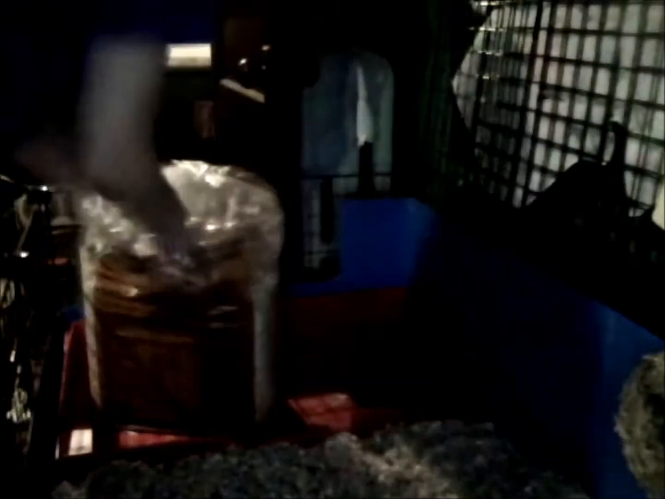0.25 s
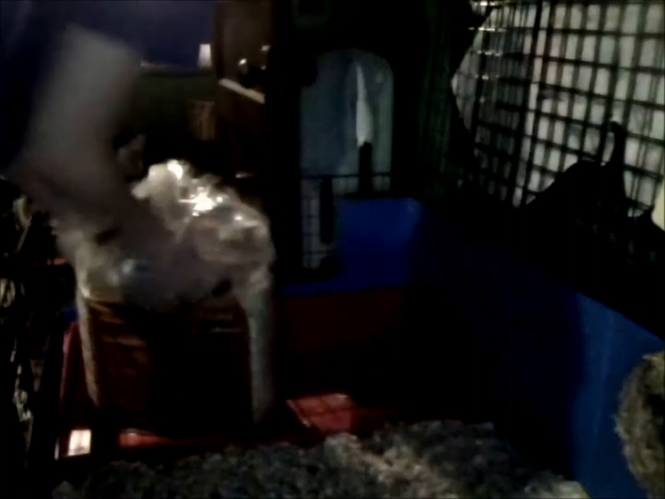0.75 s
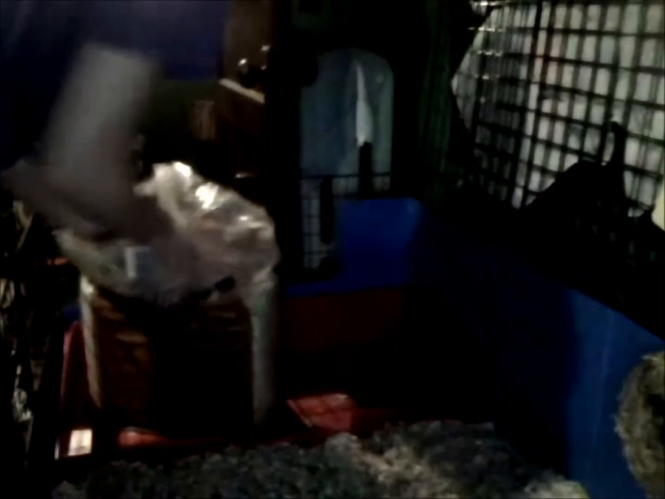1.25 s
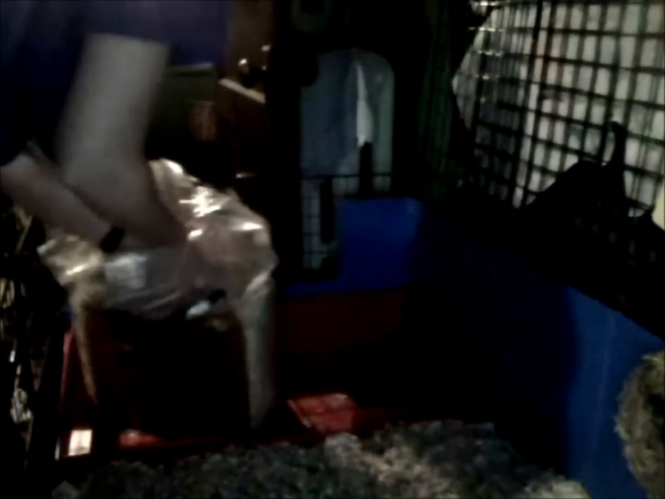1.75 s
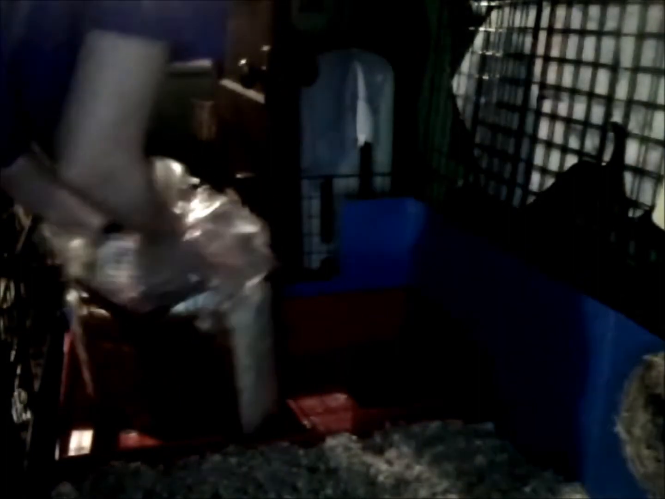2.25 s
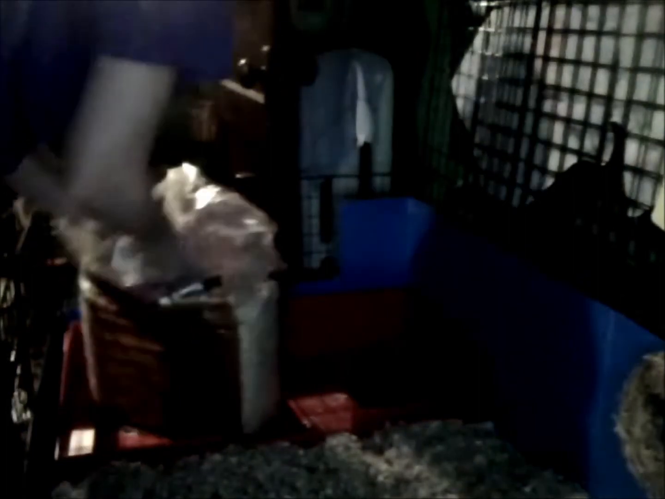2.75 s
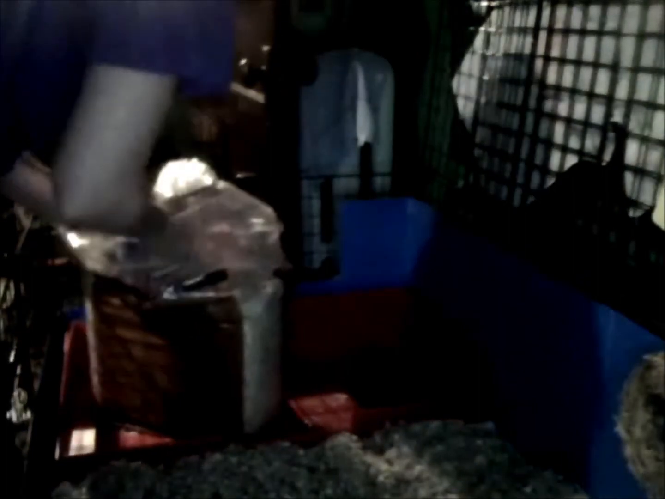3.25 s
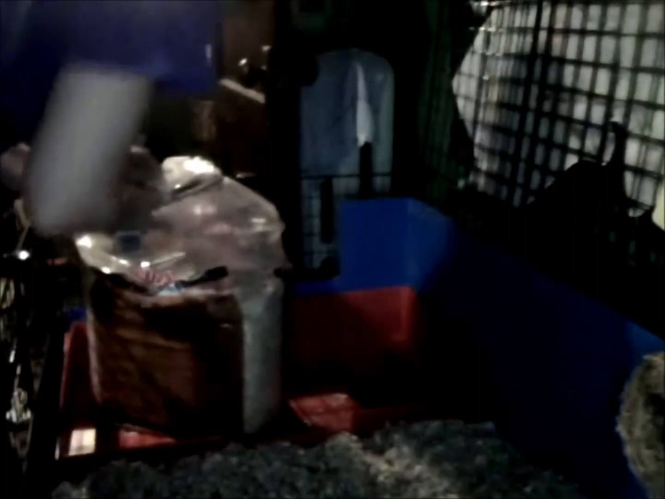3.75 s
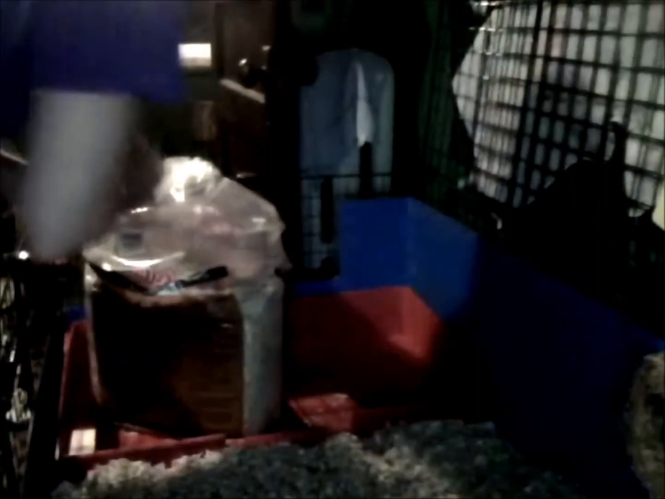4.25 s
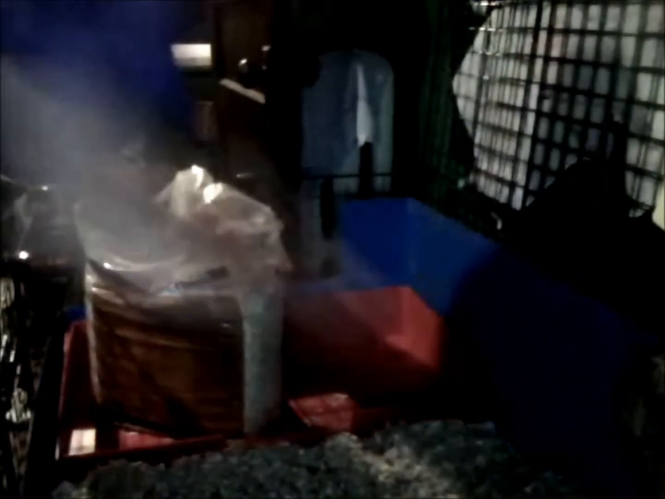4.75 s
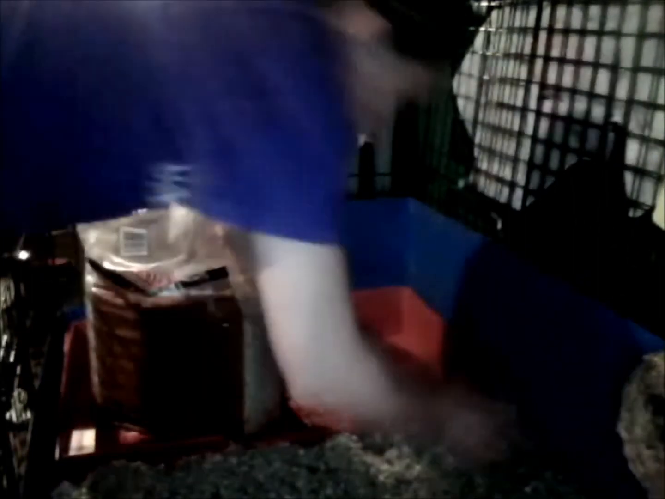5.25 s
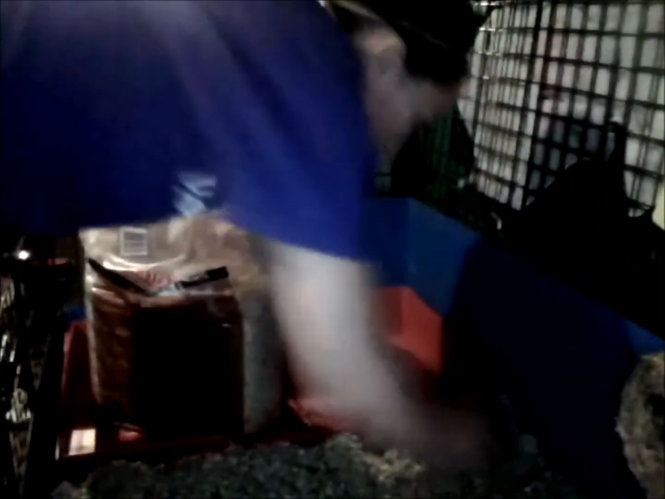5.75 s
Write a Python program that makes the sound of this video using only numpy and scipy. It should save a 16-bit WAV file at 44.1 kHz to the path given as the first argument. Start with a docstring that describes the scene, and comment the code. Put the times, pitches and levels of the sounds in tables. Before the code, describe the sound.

A dull knock and a crunchy rustle open the sound as a hand pushes into wood shavings, their plastic wrapping crackling close by. A few quiet seconds follow, holding only small ticks, light scraping and a single hollow plastic tap. Near the end the handful lands in a cage with a short, soft slap, then a click and gentle rustling. Low room tone with a faint hum continues throughout in the small indoor space.

```python
"""A dull bump and a crunch, close to the microphone: a hand digs into a plastic-wrapped bale of wood shavings
in a small room. Creases in the film buckle and snap; flakes scrape on each other. The handful is worked loose
with faint ticks and a tap on plastic, then dropped on the bedding of a cage in a few soft slaps and spread out.
Low room tone with a faint hum lies under it all."""
import sys
import numpy as np
from scipy import signal
from scipy.fft import rfft, irfft, next_fast_len
from scipy.io import wavfile

SR = 44100
rng = np.random.default_rng(int(sys.argv[2]) if len(sys.argv) > 2 else 0)


def transcribe(signal):
    """Save signal, clipped to [-1, 1], as a 16-bit WAV file at the path in sys.argv[1]."""
    frames = np.atleast_2d(signal).T
    limited = np.clip(frames, -1, 1)
    pcm = np.round(limited * 32767).astype(np.int16)
    wavfile.write(sys.argv[1], SR, pcm)


N = 264114

# strokes of the hand: middle t/s, length/s, flake level/dB, dull rubbing relative to the flakes/dB
HAND_STROKES = [(0.04, 0.092, -58, 4), (0.093, 0.014, -45, 2.5), (0.125, 0.034, -46, 1),
                (0.2, 0.025, -36.5, -11), (0.3, 0.077, -50.5, 1), (.385, 0.091, -35, -16),
                (0.523, .08, -30.5, -7.5), (0.592, 0.062, -38, -7), (0.68, 0.09, -46, -2.5),
                (1.645, 0.15, -60, -0.5), (1.94, 0.21, -62.5, 1), (2.34, 0.094, -65, 1.5),
                (3.556, 0.042, -65.5, -9), (4.231, 0.029, -67, 7.5), (4.32, 0.11, -69, 3),
                (4.47, 0.16, -69.5, -9), (5.144, 0.1, -57, 4.5), (5.355, 0.063, -63, 3.5),
                (5.475, 0.084, -64, -4), (5.729, 0.067, -58.5, -5), (5.834, 0.065, -60.5, -4),
                (5.98, 0.029, -65, -4)]
# spectrum of loose flakes scraping: f/Hz, relative level/dB
FLAKE_SPECTRUM = [(150, -44), (600, -14.5), (1500, -12), (2600, -3.5), (4000, -0.5), (5500, -3),
                  (7000, -5.5), (7800, -18), (8700, -32)]
# spectrum of packed shavings rubbing: f/Hz, relative level/dB
PACKED_SPECTRUM = [(40, -5), (100, -6), (220, -2.5), (450, -2.5), (900, -1.5), (1500, -4), (2500, -6),
                   (5000, -48), (8700, -47.5)]
# snaps of the film and of single flakes: t/s, level/dB, low cut f/Hz, facet ring f/Hz
SNAP_EVENTS = [(0.1906, -26.5, 1900, 4540), (.215, -40, 1500, 2490), (.262, -50, 900, 3000),
               (.302, -41.5, 700, 1100), (0.4184, -35, 1500, 2010), (0.4551, -31.5, 2200, 2830),
               (0.4968, -22.5, 603, 4170), (0.5098, -22.5, 600, 5430), (0.5977, -27.5, 1410, 4100),
               (.624, -35.5, 900, 2470), (0.65, -25, 710, 4970), (0.7173, -31.5, 1810, 2520),
               (0.757, -52.5, 2000, 4740), (0.9596, -52.5, 1690, 2620), (1.2689, -37.5, 2490, 4800),
               (1.759, -54, 1500, 2410), (1.7896, -54.5, 2000, 3000), (2.031, -53, 1400, 2170),
               (2.32, -58, 2000, 4000), (2.3598, -52.5, 1300, 2370), (4.2246, -54.5, 1800, 2600),
               (4.292, -54, 1500, 2490), (5.188, -48.5, 800, 2030), (5.2722, -33.5, 2230, 2220)]
# spectrum of buckling film: f/Hz, relative level/dB
FILM_SPECTRUM = [(100, -15.5), (800, -0.5), (1700, -4), (2300, -2), (4000, -5), (6900, -7), (7700, -17.5),
                 (8700, -33)]
# bumps on the bale: t/s, thud level/dB, thud centre f/Hz, crunch level/dB, crunch high cut f/Hz
BALE_BUMPS = [(0.0282, -33, 200, -27, 4000), (0.0944, -58, 1100, -33.5, 4200),
              (0.12, -28.5, 770, -28, 6200), (.1292, -57, 800, -29, 6800), (.344, -36.5, 1100, -41.5, 6500),
              (0.53, -38.5, 323, -38, 4000), (0.605, -46, 200, -43, 4000), (0.6487, -39, 1040, -49, 5000)]
# modes of the wrapped bale: f/Hz, relative level/dB, t60/s
BALE_MODES = [(85, -6, 0.11), (136, -6, 0.098), (218, -5, 0.14), (341, -2.5, 0.057), (490, 0, 0.063),
              (630, -5, 0.066), (784, 2.5, 0.061), (868, 6, 0.062), (1066, 4, 0.059), (1197, 1.5, 0.046)]
# spectrum of flakes crushed by a bump: f/Hz, relative level/dB
CRUNCH_SPECTRUM = [(100, -11), (700, -2), (1600, -4), (2300, -2.5), (3700, 0), (5000, -5), (6600, -2),
                   (7700, -16), (8700, -26)]
# clumps landing in the cage: t/s, shower level/dB, rise/s, t60/s, slap weight/dB
FALLING_CLUMPS = [(5.09, -25.5, 0.0054, 0.074, -4.5), (5.1014, -23.5, 0.00081, 0.064, -3),
                  (5.114, -24.5, 0.0024, 0.057, -11), (5.133, -34, 0.0022, 0.031, -16)]
# spectrum of the struck bedding: f/Hz, relative level/dB
BEDDING_SPECTRUM = [(30, -15), (90, -7), (170, -5.5), (300, -11.5), (440, -3.5), (620, -6.5), (970, 0.5),
                    (1300, -9.5), (2000, -3.5), (3200, -6.5), (3900, -10), (6200, -11.5), (7400, -21.5),
                    (8700, -41.5)]
# hollow taps on hard plastic: t/s, level/dB
PLASTIC_TAPS = [(3.4868, -35)]
# modes of the hard plastic: f/Hz, bandwidth/Hz, relative level/dB
PLASTIC_MODES = [(594, 400, -6), (1210, 340, 3), (2360, 130, 1.5), (3860, 490, 6), (5030, 140, -18),
                 (5560, 420, 1.5), (7100, 350, 2.5)]
# spectrum of the room tone: f/Hz, relative level/dB
ROOM_SPECTRUM = [(12, -13), (20, -1.5), (92, -2.5), (202, -5), (261, -6.5), (328, -5), (372, -6),
                 (412, -5.5), (531, -8.5), (720, -10.5), (778, -9), (1800, -21.5), (6250, -35), (7280, -46),
                 (8700, -73), (11300, -74), (19100, -120)]
# tones of the hum in the room: f/Hz, level/dB
HUM_TONES = [(91.5, -71.5), (500.6, -72.5), (725, -73)]


def rustle(t, leaves_bale_s=4.9):
    """Close up, flakes scrape and packed shavings rub; film crackles while the hand is in the bale."""
    flakes = unit(colour(grains(per_s=7000, spread_db=1), FLAKE_SPECTRUM))
    pops = np.abs(grains(per_s=130, spread_db=2.6))
    bursts = signal.fftconvolve(pops, fade(t[:2048], t60=.008))[:N]
    crackle = unit(colour(bursts * rng.standard_normal(N), FLAKE_SPECTRUM))
    packed = unit(colour(grains(per_s=2500, spread_db=3), PACKED_SPECTRUM))
    film_share = .35 * (t < leaves_bale_s)
    bright = np.sqrt(1 - film_share) * flakes + np.sqrt(film_share) * crackle
    bright_gain, packed_gain = hand_motion(t)
    return bright_gain * bright + packed_gain * packed


def hand_motion(t, settle_from_s=.7, light_rub_db=-1.5):
    """Gains of loose and packed shavings: strokes, settling and the resting hand add in power."""
    settling = undb(-62.5) * (t > settle_from_s) * fade(np.maximum(t - settle_from_s, 0), t60=5.8)
    holding = undb(-74)  # the hand is never quite still
    moves = [(settling, light_rub_db), (holding, light_rub_db)]
    for middle, length, db, rub_db in HAND_STROKES:
        away = np.minimum(np.abs(2 * (t - middle) / length), 10)
        swell = .5 ** (away ** 1.72)  # rounded, half as strong at the ends of its length
        moves.append((undb(db) * swell, rub_db))
    flake_power = sum(effort ** 2 for effort, _ in moves)
    packed_power = sum((effort * undb(rub_db)) ** 2 for effort, rub_db in moves)
    return np.sqrt(flake_power), np.sqrt(packed_power)


def film_snaps(t):
    """A crease strains, buckles within a millisecond, rings its own facet of film and settles."""
    out, t = np.zeros(N), t[:4096]
    lead = 256  # samples of strain before the snap
    strain = .27 * fade(t[lead:0:-1], t60=.031)
    release = fade(t, t60=.02) + undb(-16.5) * fade(t, t60=.068)
    for s, db, low_hz, facet_hz in SNAP_EVENTS:
        buckle = np.concatenate([strain, release]) * rng.choice([-1, 1], lead + len(t))
        buckle[lead] += 6.5  # the first give is the sharpest
        buckle[lead + int(rng.uniform(.0004, .001) * SR)] -= 4.5  # the crease flips through
        film = colour(buckle, FILM_SPECTRUM)
        ring = film + 1.2 * resonate(film, facet_hz, q=4) + 1.2 * resonate(film, hz=5350, q=7)
        # a small facet cannot radiate long waves
        ring = signal.sosfilt(signal.butter(3, low_hz, "highpass", fs=SR, output="sos"), ring)
        attack_rms = np.std(ring[lead:lead + int(.003 * SR)])
        add(out, s - lead / SR, undb(db) * ring / attack_rms)
    return out


def bale_bumps(t):
    """The hand knocks the bale: a crack and a crunch of flakes over a short thud of its modes."""
    out, t = np.zeros(N), t[:8192]
    for s, thud_db, centre_hz, crunch_db, dull_hz in BALE_BUMPS:
        thud = 0
        for hz, db, t60 in BALE_MODES:
            share = 1 / (1 + (np.log2(hz / centre_hz) / .71) ** 2)  # half at .71 octave off centre
            mode = fade(t, t60) * np.sin(2 * np.pi * (hz * t + rng.random()))
            thud += share * undb(db) * mode
        thud *= 1 - fade(t, t60=.003)
        add(out, s, set_attack(thud, thud_db, span_s=.0047))
        crush = (fade(t, t60=.015) + 1.2 * fade(t, t60=.07)) * (1 - fade(t, t60=.006))
        crunch = crush * rng.choice([-1, 1], len(t))
        crunch[int(.001 * SR)] += 12  # the crack
        crunch = signal.lfilter(*signal.butter(2, dull_hz, fs=SR), colour(crunch, CRUNCH_SPECTRUM))
        add(out, s, set_attack(crunch, crunch_db, span_s=.0033))
    return out


def handful_landing(t):
    """The handful arrives in a few clumps, each a slap within a shower of flakes on soft bedding."""
    shower_power, slaps = np.zeros(N), np.zeros(N)
    for s, db, rise, t60, slap_db in FALLING_CLUMPS:
        onset = np.exp(np.minimum(t - s, 0) / rise)
        shower = undb(db) * onset * fade(np.maximum(t - s, 0), t60)
        shower_power += shower ** 2
        slaps[int(s * SR)] = undb(slap_db - 1.5) * np.linalg.norm(shower)
    force = slaps + np.sqrt(shower_power) * grains(per_s=12000, spread_db=1.7)
    bedding = colour(signal.unit_impulse(4096), BEDDING_SPECTRUM)
    return signal.fftconvolve(force, bedding / np.linalg.norm(bedding))[:N]


def plastic_tap(t):
    """A light contact chatters for a few milliseconds and rings short modes of hard plastic."""
    out, t = np.zeros(N), t[:4096]
    for s, db in PLASTIC_TAPS:
        contact = rng.choice([-1, 1], len(t)) * (fade(t, t60=.017) + .14 * fade(t, t60=.052))
        contact[0] += 6  # the first touch
        ring = sum((-1) ** k * undb(mode_db) * resonate(contact, hz, q=hz / width)
                   for k, (hz, width, mode_db) in enumerate(PLASTIC_MODES))
        add(out, s, set_attack(ring, db, span_s=.003))
    return out


def reflections(direct, t, wet_db, t60):
    """Nearby clutter scatters a short, weak tail that reaches the microphone 3 ms late."""
    t = t[:16384]
    tail = rng.standard_normal(len(t)) * fade(t, t60) * (t > .003)
    return undb(wet_db) * signal.fftconvolve(direct, tail / np.linalg.norm(tail))[:N]


def room_tone(t):
    """The room by itself: steady dull noise with a faint wavering hum."""
    out = undb(-56.5) * unit(colour(rng.standard_normal(N), ROOM_SPECTRUM))
    for hz, db in HUM_TONES:
        phase_drift = 2.85 * np.cumsum(rng.standard_normal(N)) / np.sqrt(SR)
        out += undb(db) * unit(np.sin(2 * np.pi * hz * t + phase_drift))
    return out


def grains(per_s, spread_db):
    """Tiny fractures and slips at random moments: many weak, a few strong."""
    size = undb(spread_db * np.minimum(rng.exponential(size=N), 4))
    slips = rng.random(N) < per_s / SR
    return unit(slips * size * rng.choice([-1, 1], N))


def colour(x, points):
    """Minimum-phase filter with a spectrum given as f/Hz, level/dB."""
    n = 2 * next_fast_len(len(x))
    hz, db = np.transpose(points)
    f = np.maximum(np.fft.rfftfreq(n, 1 / SR), 1)
    gain = undb(np.interp(np.log(f), np.log(hz), db))
    cepstrum = irfft(np.log(gain))
    cepstrum[1:n // 2] *= 2
    cepstrum[n // 2 + 1:] = 0
    return irfft(rfft(x, n) * np.exp(rfft(cepstrum)))[:len(x)]


def resonate(x, hz, q):
    """One resonance with gain 1 at its centre."""
    return signal.lfilter(*signal.iirpeak(hz, q, fs=SR), x)


def set_attack(x, db, span_s):
    """Set the rms level of a hit over its first span_s seconds."""
    return x * undb(db) / np.sqrt(np.mean(x[:int(span_s * SR)] ** 2))


def undb(db):
    """Decibels to gain."""
    return 10 ** (np.asarray(db) / 20)


def unit(x):
    """Scale to rms 1."""
    return x / np.sqrt(np.mean(x ** 2))


def fade(t, t60):
    """Exponential decay, 60 dB down after t60."""
    return np.exp(-np.log(1000) * t / t60)


def add(out, s, x):
    """Mix x into out from time s."""
    i = max(int(s * SR), 0)
    out[i:i + len(x)] += x[:len(out) - i]


def scene():
    """All the handling at close range in the small room, in mono."""
    t = np.arange(N) / SR
    direct = rustle(t) + film_snaps(t) + bale_bumps(t) + handful_landing(t) + plastic_tap(t)
    scattered = reflections(direct, t, wet_db=-22.5, t60=.079)
    return (direct + scattered + room_tone(t))[None]


def record(dry):
    """A small microphone whose treble ends steeply at 8750 Hz."""
    return signal.sosfilt(signal.ellip(10, .2, 70, 8750, fs=SR, output="sos"), dry)


dry = scene()
out = record(dry)
transcribe(out)
```